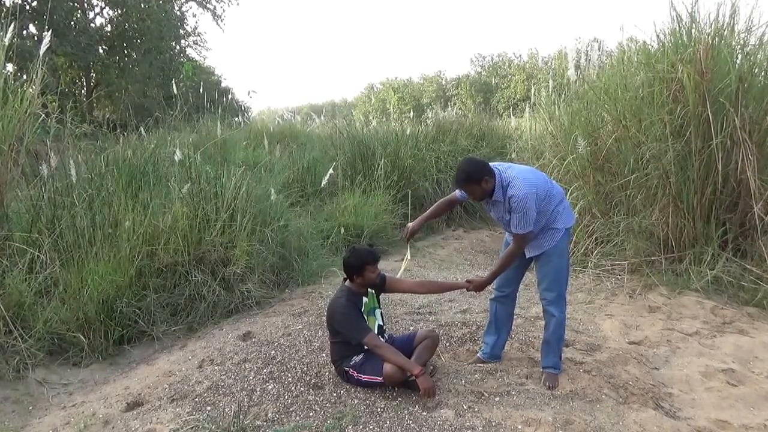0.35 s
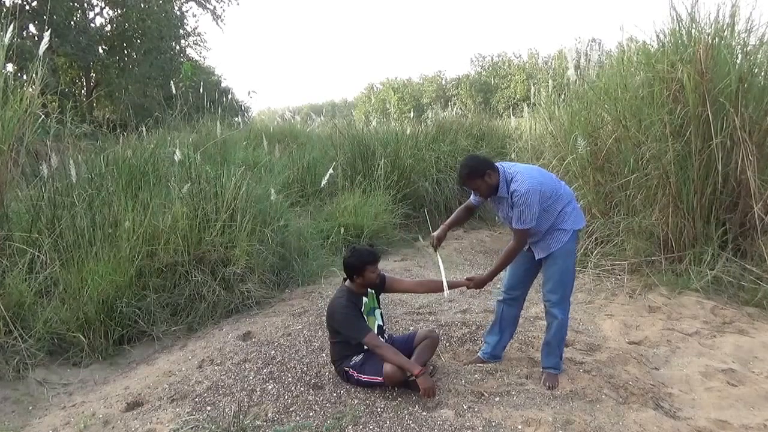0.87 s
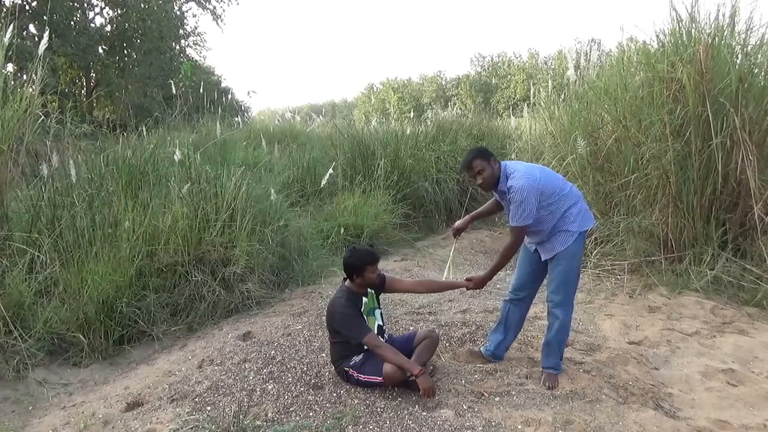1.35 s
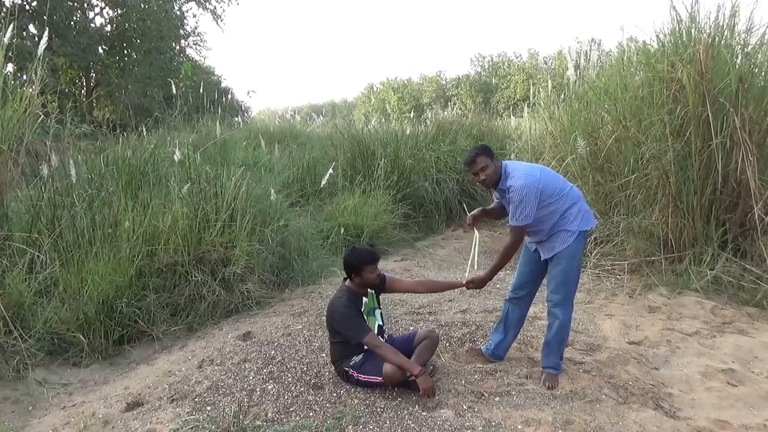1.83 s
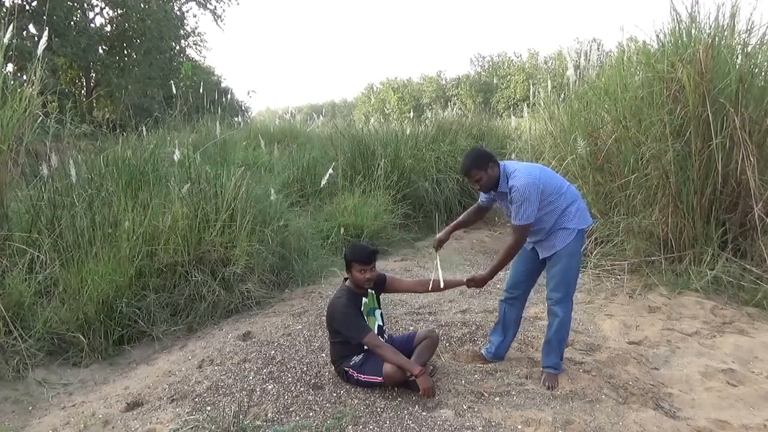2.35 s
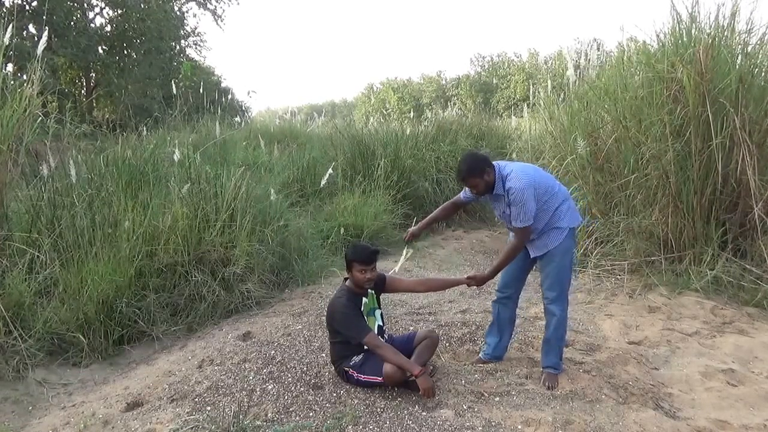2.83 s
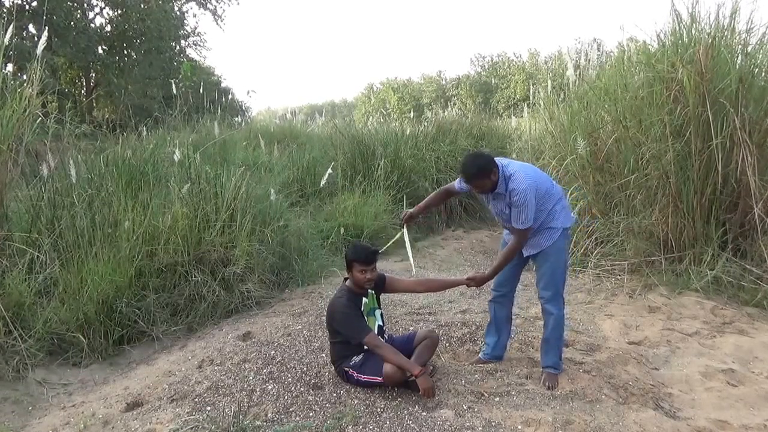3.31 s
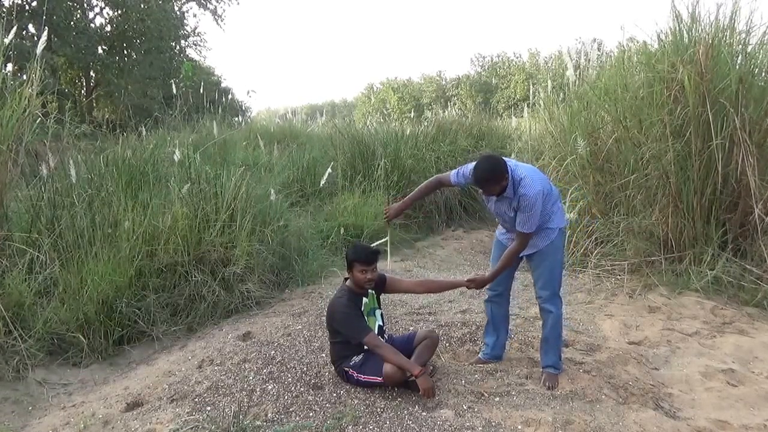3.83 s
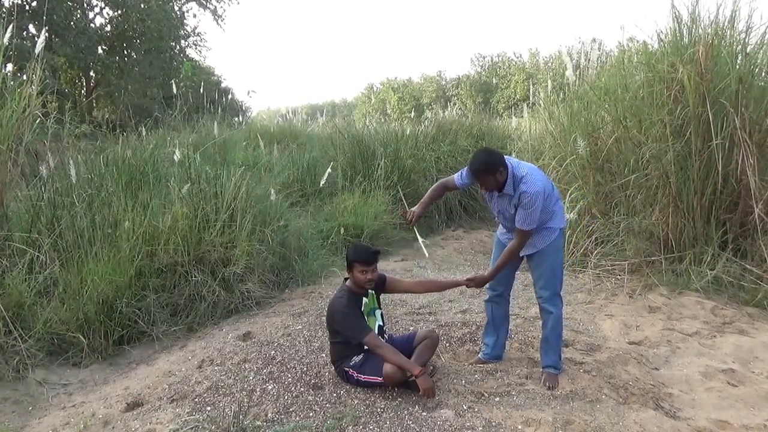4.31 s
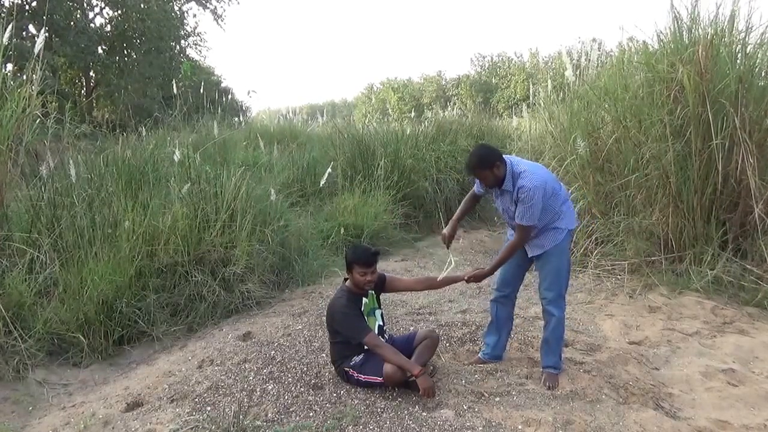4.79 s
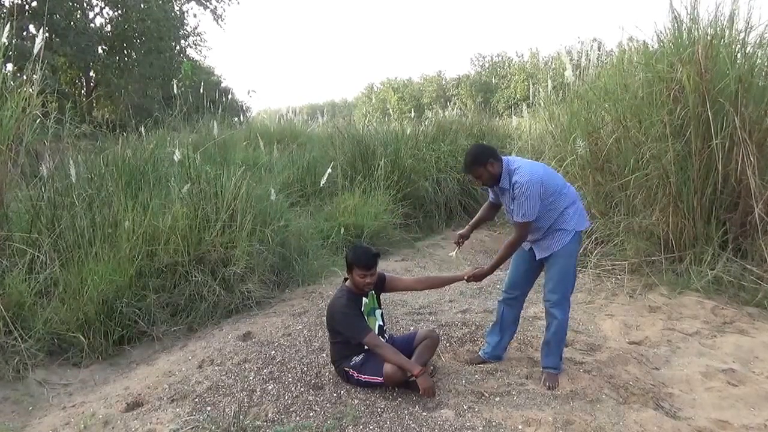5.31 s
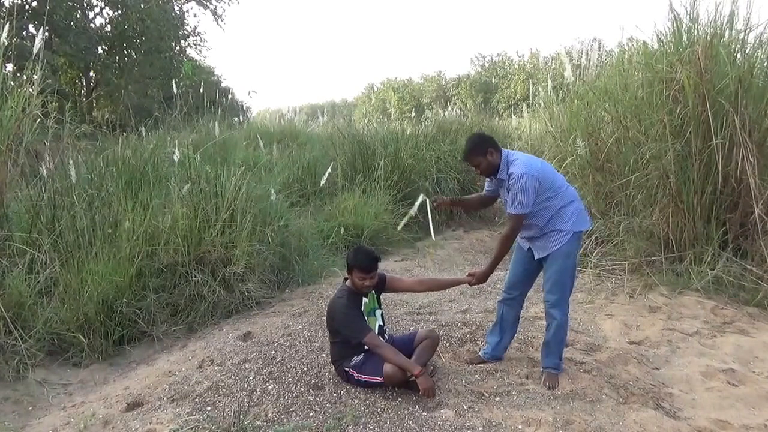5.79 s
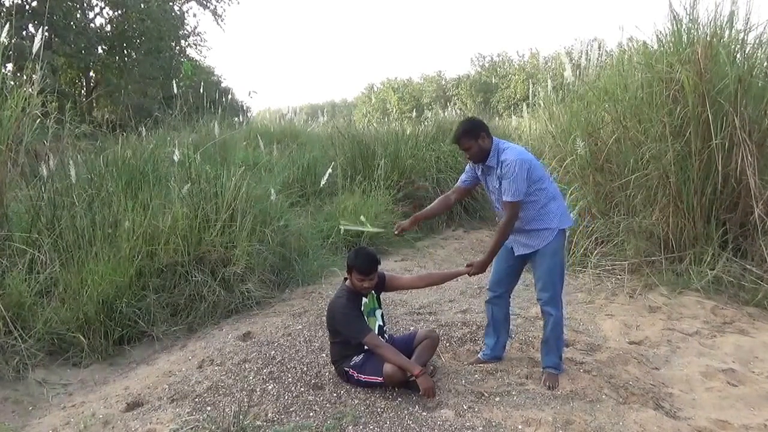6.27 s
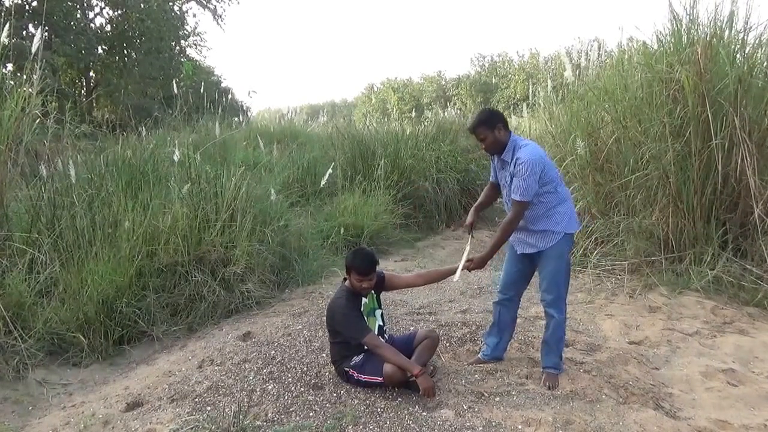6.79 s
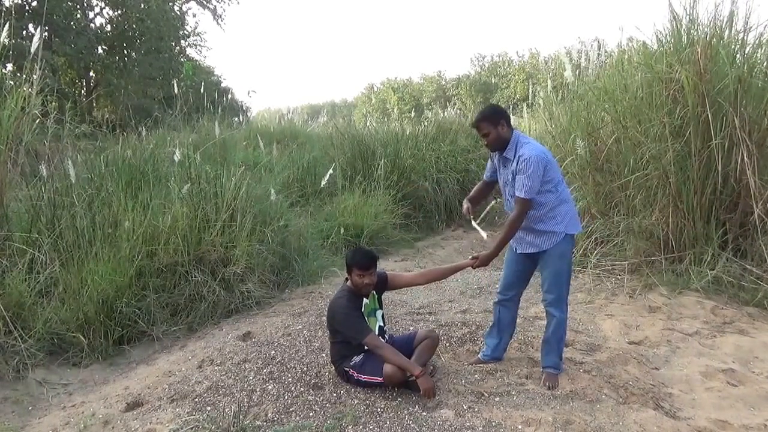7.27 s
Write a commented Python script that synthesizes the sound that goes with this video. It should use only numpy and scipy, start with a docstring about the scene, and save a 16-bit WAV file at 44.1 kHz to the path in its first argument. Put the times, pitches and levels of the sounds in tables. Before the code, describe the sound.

From 0 s, small birds chatter densely in grass outdoors: brief whistles around 2.5 kHz sliding downward, short sharp notes near 3.5 kHz, tiny chips, and rough, rapidly warbled rasps. The calls come several per second, louder and harsher around 1.7-2.4 s, with many fainter birds deeper behind and a soft scattered tail. Their body leans left, their treble right. Thin crickets near 8 kHz chirp in fast pairs until about 3.1 s, fall silent, and return from 6 s; a faint buzz hovers around 10 kHz, dropping out about 0.8-1.5 s. A low distant engine hum is strongest near 4.4 s, while soft road roar swells to about 5.2 s and then recedes. Dry cracks tick occasionally, most noticeably a duller knock at 4.1 s and sharp ticks until 4.9 s. Strong rasps sound at 5.1 and 7.3 s; thin high falling chirps punctuate the end over faint steady air hiss.

```python
"""From the start small birds chatter in grass: harmonics of moving pitches make whistles, notes and rasps.
Their body leans left and their treble right; noise tails scatter the calls, and random calls lie further off.
Pure-tone crickets chirp in pairs, pause after about 3 s and return at 6 s; gated noise buzzes higher up.
Short noise cracks gather between 4 and 5 s, while a low engine hum made of sines is at its strongest.
Road noise swells until about 5.2 s, then fades; a faint hiss of air lasts throughout."""
import sys
import numpy as np
from scipy import signal
from scipy.fft import rfft, irfft
from scipy.io import wavfile
from scipy.ndimage import uniform_filter1d

SR = 44100
rng = np.random.default_rng(int(sys.argv[2]) if len(sys.argv) > 2 else 0)


def output_pcm(signal):
    """Save a mono or channel-first signal as 16-bit PCM at the path in sys.argv[1].

    Samples are clipped to [-1, 1] before scaling.
    """
    pcm = np.clip(np.atleast_2d(signal).T, -1, 1) * 32767
    wavfile.write(sys.argv[1], SR, np.round(pcm).astype(np.int16))


def attenuation_scalar(level_db):
    """Turn a level in dB into a linear amplitude multiplier (20 dB per decade)."""
    decades = np.asarray(level_db, float) / 20
    return 10 ** decades


N = 325899
TIME = np.arange(N) / SR
LEFT_RIGHT = np.array([[1], [-1]])  # plus for the left channel, minus for the right


def curve(table):
    """Draw straight lines between the rows of a table; the first column is time."""
    s, *columns = np.transpose(table)
    return [np.interp(TIME, s, column) for column in columns]


def shade(hz, table):
    """Read a spectrum's level in dB at the given frequencies, on a logarithmic pitch scale."""
    points_hz, points_db = np.transpose(table)
    return np.interp(np.log(np.maximum(hz, 1)), np.log(points_hz), points_db)


def colour(x, table):
    """Filter a sound by (frequency [Hz], level [dB]) points."""
    hz = np.fft.rfftfreq(x.shape[-1], 1 / SR)
    return irfft(rfft(x) * attenuation_scalar(shade(hz, table)), x.shape[-1])


def unit(x):
    """Scale a sound to an rms of 1."""
    return x / np.sqrt(np.mean(x ** 2))


def walk(rate_hz, size=N):
    """Smooth random wandering with a spread near 1: random steps, averaged twice."""
    step = max(int(SR / rate_hz), 1)
    stairs = np.repeat(rng.standard_normal(size // step + 1), step)
    return 1.3 * uniform_filter1d(uniform_filter1d(stairs, step), step)[:size]


def pair(table, side_table):
    """Stereo noise of a colour; side_table sets how much the channels differ at each frequency."""
    mid, side = rng.standard_normal((2, N))
    return unit(colour(mid + colour(side, side_table) * LEFT_RIGHT, table))


def add(out, start_s, x):
    """Mix x into out from a start time, trimming what falls outside."""
    i = int(start_s * SR)
    first, last = max(i, 0), min(i + x.shape[-1], N)
    out[..., first:last] += x[..., first - i:max(last - i, 0)]


def syrinx(hz, db, partial_db, flutter_db, fade_s=0.0031):
    """A bird's voice: separately fluttering harmonics, faded from body (row 0) to treble (row 1) at 7-9 kHz."""
    phase = 2 * np.pi * np.cumsum(hz) / SR
    out = np.zeros((2, len(hz)))
    for k in range(1, 12):
        level = attenuation_scalar(partial_db(k) + flutter_db * walk(168.2, len(hz)))
        part = level * np.sin(k * phase + 2 * np.pi * rng.random())
        high = np.clip((k * hz - 7000) / 2000, 0, 1)
        out += part * (k * hz < 12000) * np.array([1 - high, high])
    t = np.arange(len(hz)) / SR
    fade = np.clip(np.minimum(t, t[-1] - t) / fade_s, 0, 1)
    return np.sqrt(2) * out * attenuation_scalar(db) * fade


def glide(length_s, first_hz, last_hz, bend, start_db, end_db):
    """Pitch and swell (dB) of a call that slides between two pitches; bend below 1 moves early."""
    u = np.linspace(0, 1, int(length_s * SR))
    hz = first_hz + (last_hz - first_hz) * u ** bend
    return hz, start_db * (1 - u) ** 2 + end_db * u ** 2


def beak(hz, centre_hz, width_hz):
    """A resonance of throat or beak: the level in dB falls away from its centre."""
    return -10 * np.log10(1 + ((hz - centre_hz) / width_hz) ** 2)


def whistle(hz, db, treble_db):
    """Resonances colour the first three harmonics; treble_db sets the fourth, and higher ones are fainter."""
    lower_db = {
        1: -3 + beak(hz, 2740, 278),
        2: 1 + beak(2 * hz, 4030, 1300),
        3: -9 + beak(3 * hz, 5460, 330),
        4: treble_db}

    def partial_db(k):
        return lower_db.get(k, treble_db.mean() - 4 + beak(k * hz, 10200, 900))

    wobble = 1 + .011 * walk(280, len(hz))
    return syrinx(hz * wobble, db, partial_db, 2.8)


def whistles():
    """Whistles slide steadily, most of them downward, and may droop late; a resonance lifts the fourth harmonic."""
    # one call a row: (start [s], end [s], first pitch [Hz], steady fall [Hz], droop at the end [Hz],
    # base level, about that of the second harmonic [dB], fourth harmonic against the base [dB])
    calls = [(0.07, 0.206, 2463, 476, 485, -26, -10.5), (0.943, 1.009, 2490, 548, 186, -29.5, -12),
             (1.034, 1.06, 2450, 407, 455, -21.5, -8), (1.453, 1.585, 2476, 30, 841, -28.5, -11.5),
             (2.225, 2.29, 2434, -86, -8, -40, -2), (2.486, 2.549, 2560, 421, 4, -36.5, -1),
             (2.661, 2.756, 2560, 562, 486, -29, -9), (2.909, 3.007, 2544, 647, 250, -31.5, -3),
             (3.169, 3.256, 2547, 950.5, 32, -29.5, -6), (3.424, 3.519, 2582, 850.5, 78, -28, -4.5),
             (3.67, 3.769, 2470, 752.5, 145, -29.5, -7), (3.941, 4.055, 2516, 803.5, 310, -31.5, -7),
             (4.218, 4.321, 2137, -21, 470, -30.5, -4), (4.403, 4.488, 2520, 62, 0, -38.5, -10.5),
             (4.716, 4.806, 2614, 680, -2, -38, -13), (4.826, 4.92, 2330, 451, 283, -35, -10),
             (4.912, 4.992, 2354, -170, -6, -36, -0.5), (4.994, 5.056, 2654, 91.5, 28, -32.5, -3),
             (5.266, 5.387, 2690, 352, 297, -33.5, -5), (5.54, 5.629, 2626, 295, 420, -32.5, -1),
             (5.696, 5.79, 2150, 267, -8, -40, -15), (5.801, 5.911, 2620, 448.5, 402, -32, 0.5),
             (6.027, 6.074, 2254, 315, 0, -34, -7), (6.072, 6.184, 2616, 420.5, 468, -34, 0),
             (6.343, 6.464, 2552, 428, 182, -34.5, 2), (6.619, 6.749, 2607, 640, 3, -32, 1.5),
             (6.889, 7.018, 2650, 662, -9, -34, 4.5), (7.177, 7.304, 2620, 716, -3, -33.5, 2.5)]
    droop_lateness = 4.6  # power of time
    out = np.zeros((2, N))
    for s, end, first_hz, fall_hz, droop_hz, db, fourth_db in calls:
        hz, swell_db = glide(end - s, first_hz, first_hz - fall_hz, 1, start_db=-6.5, end_db=-4)
        hz = hz - droop_hz * np.linspace(0, 1, len(hz)) ** droop_lateness
        treble_db = fourth_db + 2 * beak(4 * hz, 10200, 860)
        add(out, s, whistle(hz, db + swell_db, treble_db))
    return out


def notes():
    """Short low notes drop fast, then settle; nearly all their sound is the fundamental."""
    # one note a row: (start [s], end [s], first pitch [Hz], last pitch [Hz], base level [dB])
    calls = [(0.039, 0.072, 3730, 3220, -35), (0.9, 0.949, 3700, 2940, -29),
             (0.956, 1.029, 3654, 2976, -22.5), (1.194, 1.226, 3800, 3110, -23.5),
             (1.895, 1.92, 3720, 3380, -30), (2.208, 2.234, 3620, 2940, -32),
             (3.147, 3.174, 3410, 3110, -30), (3.39, 3.42, 3900, 3210, -29.5),
             (3.644, 3.678, 3630, 3080, -32), (3.931, 3.951, 3300, 3060, -39),
             (4.795, 4.82, 3240, 2990, -37), (5.051, 5.094, 3850, 3650, -26.5),
             (5.45, 5.493, 3320, 3050, -41), (6.535, 6.56, 3820, 3620, -40),
             (6.869, 6.926, 3820, 3580, -35), (7.151, 7.207, 3885, 3620, -37)]
    out = np.zeros((2, N))
    for s, end, first_hz, last_hz, db in calls:
        hz, swell_db = glide(end - s, first_hz, last_hz, .5, start_db=-2, end_db=-1.5)
        partials = {1: 0, 2: -21, 3: -17 + beak(3 * hz, 10100, 550)}
        add(out, s, syrinx(hz, db + swell_db, lambda k: partials.get(k, -60), 2.2, fade_s=0.002))
    return out


def rasp(length_s, first_hz, last_hz, db, rough):
    """Swoops up, then sinks while a fast, uneven warble keeps pulling the pitch down from its top."""
    # level of harmonics 1 to 6 ahead of the resonances, the last also for all above: (level [dB])
    harmonic_db = [-8.5, -2.5, -7, -21.5, -20.5, -48]
    t = np.arange(int(length_s * SR)) / SR
    swoop = 1 - .38 * np.exp(-t / .003)
    top_hz = first_hz + (last_hz - first_hz) * (t / length_s) ** (1 / rough)
    warble_hz = 280 * rough * (1 + .15 * walk(60, len(t)))
    warble = np.sin(2 * np.pi * np.cumsum(warble_hz) / SR)
    grip = np.clip(t / .035, 0, 1)  # the warble takes hold gradually
    pull = .2 * (1 - warble) + .02 * walk(300, len(t))
    hz = top_hz * swoop * (1 - grip * rough * pull)

    def partial_db(k):
        level = harmonic_db[min(k, 6) - 1]
        if k == 1:  # speaks best near the top of each warble
            level = level + 2 * beak(hz, 2530, 317)
        if k == 3:  # speaks best in a throat resonance
            level = level + 2 * beak(3 * hz, 5330, 333)
        return level

    tiring_db = -1 * (t / length_s - .5)  # 1 dB weaker at the end than at the start
    return syrinx(hz, db + tiring_db, partial_db, 2.25, fade_s=0.01)


def rasps():
    """Harsh calls from warbled voices; a clear call sinks further than a rough one."""
    # one rasp a row: (start [s], end [s], top pitch [Hz], base level [dB], roughness [0-1])
    calls = [(0.088, 0.156, 2500, -29, 0.31), (1.22, 1.322, 2638, -27.5, .3),
             (1.505, 1.604, 2436, -32.5, 0.41), (1.715, 1.857, 2540, -24.5, 0.7),
             (1.909, 1.991, 2262, -26.5, 0.68), (1.986, 2.114, 2497, -23.5, 0.76),
             (2.27, 2.411, 2522, -23.5, 0.74), (2.548, 2.672, 2437, -27, 0.64),
             (2.805, 2.929, 2278, -26.5, 0.66), (3.089, 3.17, 2193, -33, 0.74),
             (3.381, 3.495, 2200, -33.5, 0.57), (3.656, 3.759, 2225, -39, 0.88),
             (4.005, 4.112, 2320, -34, 0.69), (4.327, 4.42, 2315, -34.5, 0.77),
             (4.459, 4.559, 2293, -34, 0.84), (5.046, 5.25, 2628, -26.5, 0.84),
             (5.301, 5.391, 2380, -31, 0.6), (5.461, 5.544, 2210, -33, 0.84),
             (5.599, 5.676, 2434, -37.5, 0.6), (5.841, 5.948, 2400, -41, 0.3),
             (6.079, 6.213, 2393, -34.5, 0.44), (6.293, 6.456, 2397, -36.5, 0.65),
             (6.588, 6.749, 2433, -32.5, 0.65), (6.996, 7.101, 2453, -34.5, 0.88),
             (7.314, 7.42, 2545, -24.5, 0.81)]
    out = np.zeros((2, N))
    for s, end, hz, db, rough in calls:
        add(out, s, rasp(end - s, hz, hz - 1249.6 * (1 - rough), db, rough))
    return out


def chips():
    """Quick, shaky upward chips open a phrase; their second harmonic is the strongest."""
    # one chip a row: (time [s], base level [dB])
    calls = [(.085, -32), (.883, -40), (1.186, -40), (1.448, -34), (2.54, -33), (2.803, -46), (3.085, -44),
             (3.378, -43), (3.64, -41), (3.92, -39)]
    partials = {1: -14, 2: 0, 3: -9}
    size = int(.014 * SR)
    out = np.zeros((2, N))
    for s, db in calls:
        hz = np.linspace(1400, 2500, size) * (1 + 0.073 * walk(640, size))
        add(out, s, syrinx(hz, db, lambda k: partials.get(k, -24), 6, fade_s=0.00037))
    return out


def falls():
    """Steep thin falls at the top of the treble: one slightly shaky sine each, as higher harmonics are cut."""
    # one fall a row: (start [s], end [s], first pitch [Hz], last pitch [Hz], base level [dB])
    calls = [(0.15, 0.197, 10450, 8860, -41.5), (3.47, 3.497, 10750, 9500, -42),
             (5.036, 5.065, 10700, 9300, -41), (5.603, 5.641, 10900, 9660, -47),
             (5.88, 5.924, 10800, 9800, -49), (6.142, 6.175, 11270, 9500, -42),
             (6.409, 6.451, 11100, 9270, -42), (6.69, 6.726, 10950, 9360, -40),
             (6.96, 6.995, 11000, 9500, -35.5), (7.234, 7.28, 11030, 9400, -47)]
    out = np.zeros((2, N))
    for s, end, first_hz, last_hz, db in calls:
        hz = np.linspace(first_hz, last_hz, int((end - s) * SR))
        wobble = 1 + 0.0077 * walk(280, len(hz))
        add(out, s, syrinx(hz * wobble, db, lambda k: 0, 5))
    return out


def near_birds():
    """The calls that stand out; their body and treble arrive from different sides."""
    # the flock's left minus right level ahead of a scaling of each column:
    # (time [s], body lean [dB], treble lean [dB])
    flock_side = [(0, 7, -6), (1.2, 7, -7), (2.5, 8.5, -5), (4.7, 10, -7), (5.2, 7, -2.5), (6.5, 8.5, -6),
                  (7.1, 10, -5), (7.39, 5, -2)]
    body, treble = whistles() + notes() + rasps() + chips() + falls()
    body_db, treble_db = curve(flock_side)
    side = LEFT_RIGHT / 2
    return body * attenuation_scalar(1.02 * side * body_db - 2.5) + treble * attenuation_scalar(0.64 * side * treble_db)


def grass(x, t60_s, db, wide):
    """Scatter from stems and trees: a fading noise tail, partly shared by the channels, shapes the echo."""
    t = np.arange(int(.8 * SR)) / SR
    fade = np.exp(-np.log(1000) * t / t60_s) * np.clip(t / 0.0015, 0, 1)
    mid, side = rng.standard_normal((2, len(t))) * fade
    tail = colour(mid + wide * side * LEFT_RIGHT, [(2000, -3.5), (5000, -1), (7000, 5.5), (11000, -4)])
    tail = tail / np.sqrt(np.sum(tail ** 2) / 2)
    return signal.fftconvolve(x, tail, axes=1)[:, :N] * attenuation_scalar(db)


def far_birds(count=260):
    """Whistles and rasps at random times, pitches, levels and sides from deeper in the grass."""
    # level of these birds before the grass scatters them: (time [s], level [dB])
    far_level = [(0, -43), (.3, -55), (.8, -62), (1.1, -44), (2.0, -41), (3.0, -40), (3.9, -41), (4.4, -38),
                 (4.65, -44), (5.0, -37), (5.5, -38), (6.0, -37), (6.5, -38), (6.8, -39), (7.39, -37)]
    out = np.zeros((2, N))
    for when, kind, pitch, size, side in rng.random((count, 5)):
        if kind < .3:
            hz = np.linspace(2600, 1950, int(.1 * SR)) * (.9 + .2 * pitch)
            call = whistle(hz, 6 * size, np.full(len(hz), -14.))
        else:
            call = rasp(.13, 2300 + 350 * pitch, 2100, 6 * size + 2, 0.91)
        lean_db = LEFT_RIGHT * (2 + 3.8 * (side - .5))
        add(out, when * N / SR - .05, call.sum(0) * attenuation_scalar(lean_db))
    out = colour(out, [(2000, -0.5), (3000, -1), (3800, 2.5), (4800, -1.5), (5500, 0)])
    return unit(out) * attenuation_scalar(curve(far_level)[0])


def crickets():
    """Two crickets: chirps follow evenly through a bout, each of two pure-tone wing strokes."""
    # one bout a row; levels vary by chance from chirp to chirp:
    # (first chirp [s], last chirp [s], pitch [Hz], level at the first [dB], level at the last [dB])
    bouts = [(.008, 1.065, 8140, -39.5, -41.5), (1.196, 2.428, 8150, -40, -42.5),
             (2.921, 3.099, 8200, -43, -42), (6.054, 7.29, 8140, -43.5, -36.5),
             (.01, 1.043, 7940, -48, -42.5), (1.211, 3.11, 7930, -43, -44), (6.252, 7.268, 7880, -52, -41)]
    period_s, scatter_db = .174, 1.7  # the period is rounded to fit each bout
    stroke_s, stroke_gap_s = 0.034, 0.047  # the gap runs from stroke centre to stroke centre
    out = np.zeros(N)
    t = np.arange(-stroke_s / 2, stroke_s / 2, 1 / SR)
    stroke = np.clip(1.04 * np.cos(np.pi * t / stroke_s), 0, 1)
    for first_s, last_s, hz, first_db, last_db in bouts:
        for u in np.linspace(0, 1, round((last_s - first_s) / period_s) + 1):
            chirp_s = first_s + u * (last_s - first_s)
            db = first_db + u * (last_db - first_db) + scatter_db * rng.standard_normal()
            for gap_s in (0, stroke_gap_s):
                tone = np.sin(2 * np.pi * (hz * t + rng.random()))
                add(out, chirp_s + gap_s + t[0], attenuation_scalar(db) * stroke * tone)
    return out * attenuation_scalar(-.4 * LEFT_RIGHT)  # slightly to the right


def buzz():
    """A high insect buzz: narrow noise gated at the wing rate of 170 Hz."""
    # loudness of the buzz: (time [s], level [dB])
    buzz_level = [(0, -59), (.82, -56.5), (.84, -85), (1.5, -54), (3.0, -55), (4.5, -53.5), (5.5, -51),
                  (7.39, -57)]
    band = colour(rng.standard_normal(N), [(9600, -41), (10000, 9), (10200, -20), (10400, -1), (10800, -45)])
    gate = (1 + np.cos(2 * np.pi * 170 * TIME)) ** 0.38
    return unit(band * gate) * attenuation_scalar(curve(buzz_level)[0])


def ticks():
    """Dry twigs, gravel and beaks: short fading noise cracks, strongest round their centre pitch."""
    # one crack a row: (time [s], peak level [dB], centre [Hz], decay [s])
    cracks = [(.354, -33, 9000, 0.0019), (0.603, -32, 1980, 0.0055), (0.646, -31, 2070, 0.0033),
              (1.347, -32, 9000, .002), (2.449, -27, 9500, .002), (4.14, -19, 2150, 0.029),
              (4.172, -25, 1600, 0.0037), (4.196, -22, 1700, 0.0033), (4.542, -21.5, 8340, 0.0018),
              (4.697, -23, 3880, 0.0014), (4.708, -25, 6000, 0.0014), (4.876, -27, 9500, .003),
              (6.595, -25.5, 10000, .004), (6.868, -26, 10100, 0.0066), (7.15, -24, 10000, 0.0046)]
    out = np.zeros(N)
    t = np.arange(int(0.075 * SR)) / SR
    for s, db, hz, decay_s in cracks:
        noise = rng.standard_normal(len(t))
        crack = colour(noise, [(hz / 3, -22), (hz, 0), (2 * hz, -20), (4 * hz, -32)])
        crack = crack * np.exp(-t / decay_s)
        add(out, s, crack * attenuation_scalar(db) / np.abs(crack).max())
    return out


def engine():
    """A far engine: a few low multiples of the firing rate, wavering over the distance."""
    # course of the engine: (time [s], firing rate [Hz], base level [dB])
    course = [(0, 53.05, -64.5), (2.0, 54.95, -65.5), (2.7, 55.8, -58), (4.4, 58.1, -52),
              (5.9, 56.97, -64.5), (7.39, 57.1, -69)]
    # its sines: (multiple of the firing rate, level against the base [dB])
    orders = [(1, -6), (2, -9.5), (3, -3)]
    hz, db = curve(course)
    phase = 2 * np.pi * np.cumsum(hz) / SR
    out = np.zeros(N)
    for k, order_db in orders:
        out += np.sqrt(2) * attenuation_scalar(db + order_db + 1.5 * walk(2.78)) * np.sin(k * phase)
    return out


def road():
    """Tyre roar from broad noise; its upper part swells on its own and is wider."""
    # swells ahead of a fixed lift: (time [s], base level [dB], upper part against it [dB])
    swell = [(0, -44, 0), (1.15, -47.5, -1.5), (1.45, -43, -1.5), (3.65, -39, -3), (4.4, -38.5, -1),
             (5.21, -35.5, -4.5), (5.68, -42.5, -2.5), (7.39, -42.5, -2.5)]
    # spectrum of the roar before it is split: (frequency [Hz], level [dB])
    roar_colour = [(24, -45), (40, -47), (64, -26), (86, -26.5), (172, -13.5), (206, -21.5), (389, -4),
                   (514, -0.5), (840, -7), (2000, -13.5), (2600, -75), (4400, -120)]
    db, upper_db = curve(swell)
    roar = pair(roar_colour, [(200, -27), (500, -18), (1200, -7), (2500, -2.5)])
    low = colour(roar, [(700, 4), (900, -80)])
    upper = unit(roar - low)
    both = low * attenuation_scalar(db + 3) + upper * attenuation_scalar(db + upper_db + 4)
    both[0] = colour(both[0], [(150, 0), (600, -3), (1500, -4.5)])  # duller on the left
    return both


def air():
    """A steady, faint hiss of coloured noise at -47 dB, wider at high pitches."""
    # spectrum of the hiss: (frequency [Hz], relative level [dB])
    air_colour = [(900, 6), (1500, 8), (2700, 13), (4500, -1), (7000, 3), (9000, 4), (11500, -33)]
    return pair(air_colour, [(2000, -9), (10000, 2)]) * attenuation_scalar(-47)


def scene():
    """All sources together; the near and far calls are also scattered by the grass."""
    near = near_birds()
    far = far_birds()
    birds = near + far
    scatter = grass(near, 0.14, -0.5, 0.63) + grass(near, 0.8, -9, 0.18) + grass(far, 0.54, -0.14, 0.99)
    insects = crickets() + buzz()
    return birds + scatter + insects + ticks() + engine() + road() + air()


def band_limit(x):
    """A steep low-pass at the top of the band."""
    return signal.sosfilt(signal.butter(12, 11410, fs=SR, output="sos"), x)


def record(dry):
    """A steep filter cuts the top of the finished mix."""
    top_hz = 11180
    mix = colour(dry, [(top_hz, 0), (1.01 * top_hz, -70)])
    return band_limit(mix)


dry = scene()
out = record(dry)
output_pcm(out)
```